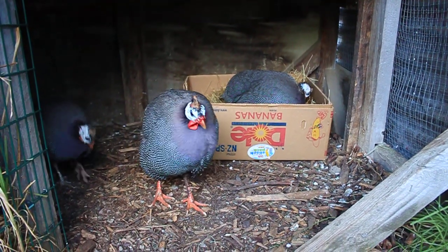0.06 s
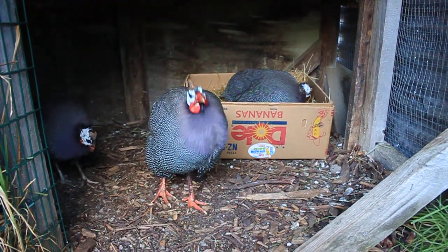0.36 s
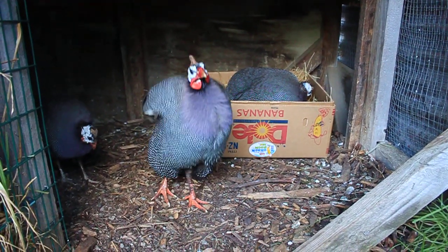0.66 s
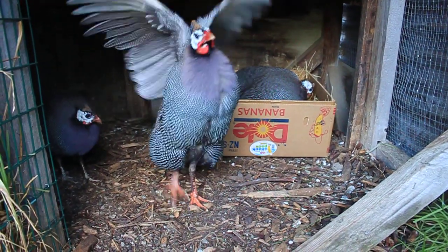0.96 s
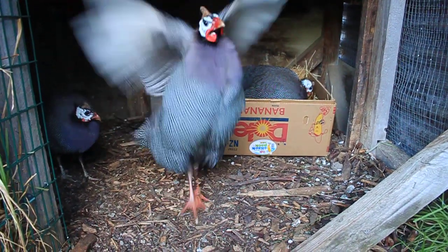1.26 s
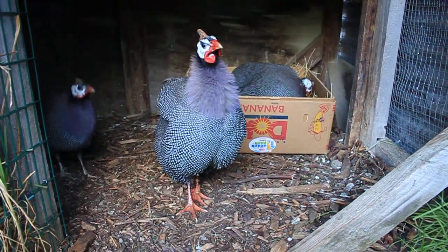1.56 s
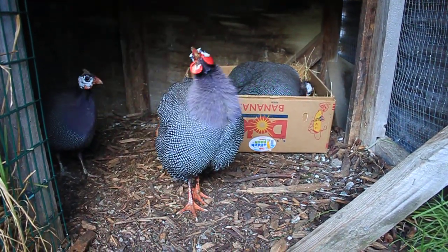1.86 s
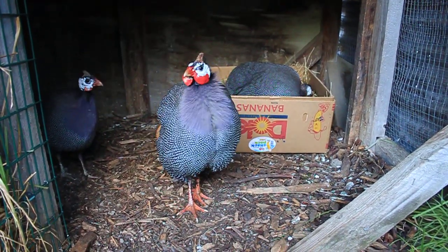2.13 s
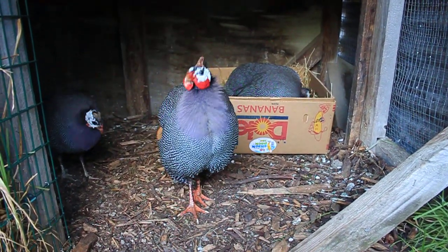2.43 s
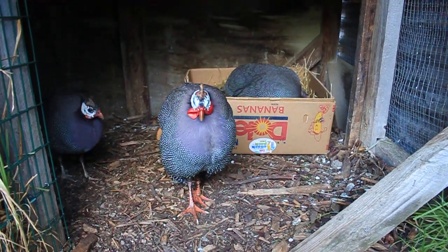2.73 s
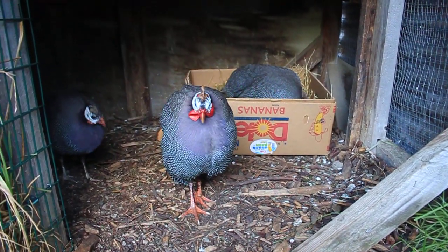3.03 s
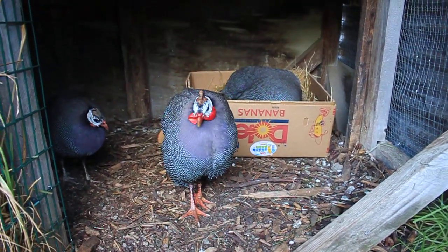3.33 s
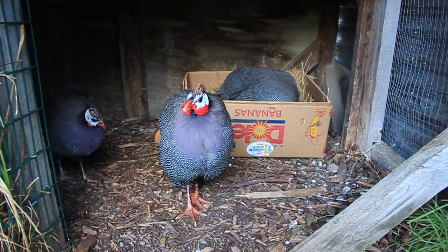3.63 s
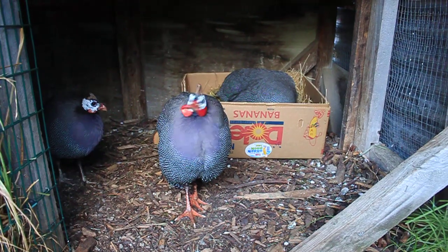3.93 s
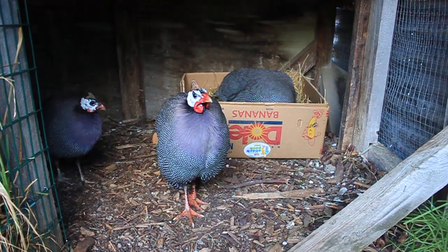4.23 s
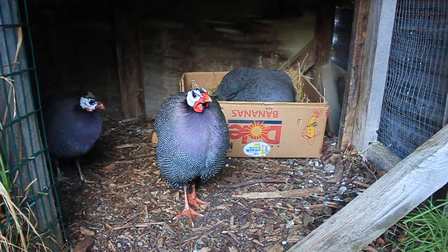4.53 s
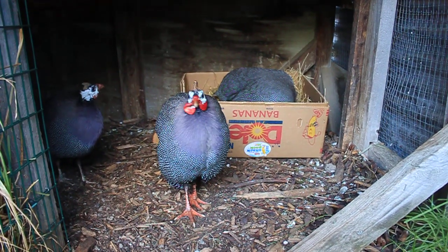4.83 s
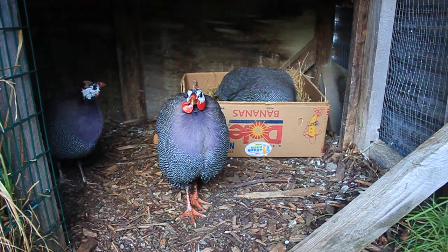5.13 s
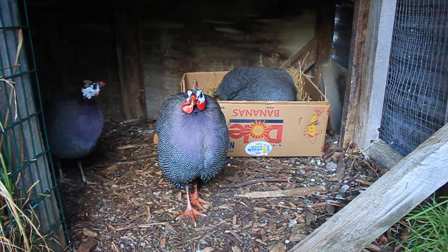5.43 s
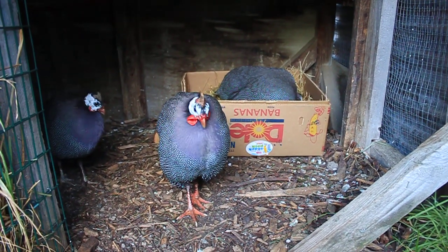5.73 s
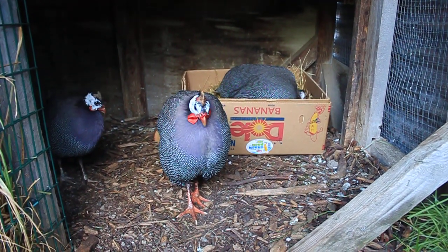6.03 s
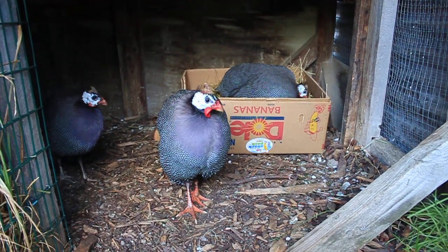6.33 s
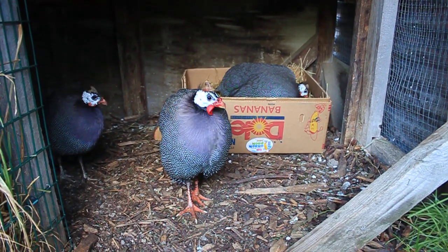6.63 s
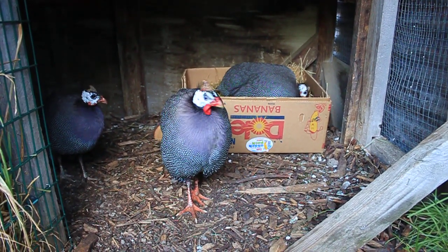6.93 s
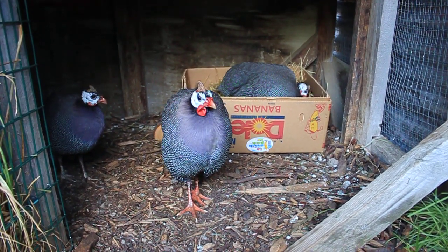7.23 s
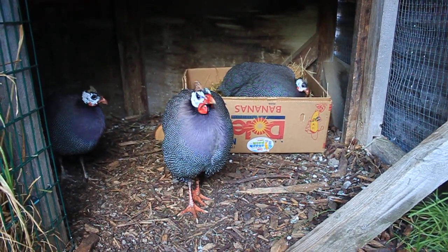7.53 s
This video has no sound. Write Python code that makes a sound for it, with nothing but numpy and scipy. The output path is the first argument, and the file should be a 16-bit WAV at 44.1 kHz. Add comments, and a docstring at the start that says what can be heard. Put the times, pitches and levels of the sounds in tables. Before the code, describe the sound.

Guinea fowl give short, sharp, high chirps in a small wooden coop. Early on, one bird flaps its wings with a soft feathery rustle. Then come four long squeaky calls, each holding a whistle, leaping higher and warbling, with more chirps between them. Feet tick lightly in dry litter and a cardboard box is softly bumped. The birds sound close, with a tight echo, over faint outdoor air and a low hum.

```python
"""Guinea fowl chirp in a small wooden coop, then give four long squeaky calls that hold a low
whistle, leap up and warble. Each voice is a syrinx tone whose harmonics sweep through throat
resonances; a slower membrane vibration adds buzz. Feet tick in the litter, one bird flaps its
wings, the nest box is bumped, soft rasps come from farther back. Close boards echo the voices,
ticks and bumps. A faint hum lies under the outdoor air."""
import sys
import numpy as np
from scipy import signal
from scipy.fft import rfft, irfft, next_fast_len
from scipy.io import wavfile

SR = 44100
rng = np.random.default_rng(int(sys.argv[2]) if len(sys.argv) > 2 else 0)


def wrap_up_sound(samples):
    """Save the sound to the file named by the first command line argument, as 16-bit audio."""
    columns = np.atleast_2d(samples).T
    # keep every value between -1 and 1, then stretch to whole-number steps
    tamed = np.clip(columns, -1, 1)
    steps = np.round(tamed * 32767).astype(np.int16)
    wavfile.write(sys.argv[1], SR, steps)


N = 338247
TIME = np.arange(N) / SR


def from_db(db):
    """Decibels to gain."""
    return 10 ** (np.asarray(db) / 20)


def rms_one(x):
    """Scale to unit power."""
    return x / np.sqrt(np.mean(x ** 2) + 1e-20)


def at_hz(spectrum, hz):
    """Gain in dB, interpolated over log frequency."""
    knots_hz, db = np.transpose(spectrum)
    return np.interp(np.log(np.maximum(hz, 1)), np.log(knots_hz), db)


def coloured(x, spectrum):
    """Filter by rows of freq_hz, gain_db."""
    size = next_fast_len(len(x) + 512)
    gain = from_db(at_hz(spectrum, np.arange(size // 2 + 1) * SR / size))
    return irfft(rfft(x, size) * gain, size)[:len(x)]


def noise(spectrum):
    """Coloured noise, unit power."""
    return rms_one(coloured(rng.standard_normal(N), spectrum))


def drift(rate_hz, size):
    """Low-passed random wander, about unit spread."""
    lowpass = signal.butter(2, rate_hz, fs=SR, output="sos")
    return rms_one(signal.sosfilt(lowpass, rng.standard_normal(size + SR // 8)))[-size:]


def glide(t, knots, values):
    """Interpolate, slowing at each knot."""
    step = np.interp(t, np.sort(knots), np.arange(len(knots)))
    eased = step - .5 * np.sin(2 * np.pi * step) / (2 * np.pi)
    return np.interp(eased, np.arange(len(knots)), values)


def ramp(t, start_s, end_s):
    """Linear rise, 0 to 1."""
    return np.clip((t - start_s) / (end_s - start_s), 0, 1)


def bell(t, centre_s, width_s):
    """Gaussian bump, height 1."""
    return np.exp(-((t - centre_s) / width_s) ** 2)


def add(out, start_s, sound):
    """Mix in from start_s."""
    at = max(int(start_s * SR), 0)
    out[at:at + len(sound)] += sound[:N - at]


def air(level_db=-50):
    """Outdoor air: steady, bass-heavy noise."""
    spectrum = [(15, -56.5), (25, -25.5), (59, -7.5), (108, -7), (137, -2.5), (161, -10), (206, -10.5),
                (249, -11.5), (363, -12), (531, -18.5), (988, -16.5), (2050, -22.5), (2550, -26.5),
                (11000, -35.5), (16000, -40)]   # noise colour: freq_hz, density_db
    return from_db(level_db) * noise(spectrum)


def hum(waver=.28, peak_s=4, rise_db_per_s=1.6, fall_db_per_s=1.5):
    """Low tones waver in level and phase, swelling and fading together."""
    tones = [(70, 16, -60), (135.02, 3.3, -52.5), (209.8, 8.4, -60)]   # hum tones: pitch_hz, width_hz, level_db
    out = np.zeros(N)
    for pitch_hz, width_hz, level_db in tones:
        phasor = 1 + waver * (drift(width_hz, N) + 1j * drift(width_hz, N))
        out += from_db(level_db) * rms_one(np.real(phasor * np.exp(2j * np.pi * pitch_hz * TIME)))
    return out * from_db(-np.maximum(rise_db_per_s * (peak_s - TIME), fall_db_per_s * (TIME - peak_s)))


def syrinx(pitch_hz, effort_db, throat, overtone_db, hoarse_rad, buzz=0, fall_db=8):
    """Five harmonics through the throat; buzz bends the cycles and pulses the overtones."""
    phase = 2 * np.pi * np.cumsum(pitch_hz) / SR + np.angle(1 + buzz)
    phase += hoarse_rad * drift(1100, len(phase))   # turbulence unsettles single cycles
    bursts = np.exp(2.8 * (np.real(buzz) - .78 * np.abs(buzz)))
    tone = np.sin(phase)
    for k in range(2, 6):
        gain = from_db(overtone_db - fall_db * (k - 2.5)) * (k * pitch_hz < SR / 2)
        tone += bursts * gain * np.sin(k * phase)
    edges = signal.windows.tukey(len(tone), min(.004 * SR / len(tone), 1))
    return coloured(np.sqrt(2) * tone * from_db(effort_db) * np.abs(1 + buzz) * edges, throat)


def chirps(events, shape, overtone_db, jitter, hoarse_rad):
    """One quick syrinx gesture, stretched and transposed per chirp."""
    throat = [(1900, -6), (2700, 1.5), (3400, -0.5), (4000, -1), (4600, -15), (5400, -22), (6600, -21.5),
              (8000, -15.5), (9200, -19.5), (10600, -21), (15500, -37)]   # throat and beak resonances: freq_hz, gain_db
    knots, pitch_ratio, effort_db = np.transpose(shape)
    out = np.zeros(N)
    for start_s, length_s, top_hz, level_db in events:
        progress = np.linspace(0, 1, int(length_s * SR))
        pitch_hz = top_hz * glide(progress, knots, pitch_ratio)
        pitch_hz *= 1 + jitter * drift(610, len(progress))
        drive_db = level_db + glide(progress, knots, effort_db)
        add(out, start_s, syrinx(pitch_hz, drive_db, throat, overtone_db, hoarse_rad, fall_db=6))
    return out


def chatter():
    """Chips and cheeps arch in register jumps; a pip rises, peeps fall."""
    # chirp events: start_s, length_s, top_hz, level_db
    chips = [(.247, 0.044, 4910, -24), (1.7205, 0.04, 4644, -29), (2.167, 0.038, 4370, -32),
             (3.559, 0.0492, 4745, -24.5), (3.966, .046, 4870, -24), (6.407, 0.048, 4958, -26.5),
             (6.641, .044, 4834, -26)]
    cheeps = [(.313, 0.05, 5450, -26), (.569, 0.049, 4874, -28), (2.6845, 0.0556, 5030, -29),
              (4.699, 0.047, 5140, -30.5), (5.0415, .055, 5184, -25.5), (6.58, .053, 5240, -29.5),
              (6.936, .048, 5186, -29)]
    pips = [(1.0425, 0.019, 4540, -23.5)]
    peeps = [(2.446, 0.028, 3595, -40.5), (2.757, 0.019, 3700, -36.5)]
    # gestures: length_share, pitch_ratio, effort_db
    chip_shape = [(0, .59, -14.5), (.13, .52, -6), (.17, .7, -1), (.31, .64, -4), (.35, .76, 5),
                  (.4, .88, 0), (.68, 0.9787, 4), (.819, .84, -4.5), (.921, .6, 0.5), (1, 0.4, -9)]
    cheep_shape = [(0, .44, -20.5), (.185, 0.45, -5), (0.217, 0.63, 4), (.35, .61, -0.5), (.45, .87, 1.5),
                   (.65, 1, 0), (.83, .88, -9.5), (.94, .58, -9), (1, .46, -17)]
    pip_shape = [(0, .52, -7), (0.221, .72, 5), (.45, 0.89, 0.5), (.75, 1, 0.5), (1, 1, -35)]
    peep_shape = [(0, 0.98, -10.5), (.45, 0.98, -11), (.75, .86, -4), (1, 0.66, 1.5)]
    return (chirps(chips, chip_shape, overtone_db=-4.5, jitter=.04, hoarse_rad=.12)
            + chirps(cheeps, cheep_shape, overtone_db=-6.5, jitter=.049, hoarse_rad=.086)
            + chirps(pips, pip_shape, overtone_db=-7, jitter=.056, hoarse_rad=.1)
            + chirps(peeps, peep_shape, overtone_db=1.5, jitter=.008, hoarse_rad=.08))


def litter(t60_s=.013, half_width=.082):
    """Feet and beaks snap dry litter: tiny band-passed noise bursts."""
    ticks = [(0.367, -33, 11530), (.3842, -32.5, 11500), (0.969, -30.5, 10040), (1.53, -39.5, 11000),
             (1.793, -39, 11000), (1.906, -34.5, 11030), (1.907, -35.5, 3200), (3.244, -38, 11500),
             (3.687, -34.5, 10630), (3.687, -36, 3000), (4.767, -45.5, 10000), (5.2935, -43, 10500),
             (5.752, -36, 10500), (5.915, -35, 10400), (6.846, -39, 11540)]   # snaps: start_s, peak_db, centre_hz
    out, t = np.zeros(N), TIME[:SR // 20]
    for start_s, peak_db, centre_hz in ticks:
        edges_hz = [centre_hz * (1 - half_width), centre_hz * (1 + half_width)]
        band = signal.butter(1, edges_hz, "band", fs=SR, output="sos")
        snap = signal.sosfilt(band, rng.standard_normal(len(t)) * from_db(-60 * t / t60_s))
        add(out, start_s, from_db(peak_db) * snap / np.abs(snap).max())
    return out


def wings(release_s=.16, grain_db=1.5):
    """Feathers slide over each other: a grainy rustle swelling with each beat."""
    strokes = [(.9, 0.55, 0.058, -47.5), (1.032, .1, 0.012, -46), (1.11, 0.116, 0.031, -44.5),
               (1.235, .12, 0.0874, -45.5)]   # wing beats: full_spread_s, swell_s, hold_s, level_db
    feathers = [(200, 4.5), (700, 1.5), (2000, -0.5), (4500, 3), (7000, -3.5), (12000, 2.5), (16000, -6.5)]   # rustle colour: freq_hz, density_db
    envelopes_db = []
    for spread_s, swell_s, hold_s, level_db in strokes:
        before, after = (spread_s - TIME) / swell_s, (TIME - spread_s - hold_s) / release_s
        envelopes_db.append(level_db - 20 * np.maximum(np.maximum(before, after), 0))
    return noise(feathers) * from_db(np.max(envelopes_db, axis=0) + grain_db * drift(180, N))


def nest_box():
    """A bird bumps the box; its cardboard modes ring at strengths that vary per bump."""
    bumps = [(1.727, -52.5), (3.597, -41), (3.605, -40.5), (3.779, -49.5)]   # impacts: start_s, level_db
    modes = [(324.4, -2, 0.41), (427, 4, 0.065), (545, 7, 0.03), (760, -23, 0.054), (960, -20.5, 0.05)]   # box modes: freq_hz, gain_db, t60_s
    out, t = np.zeros(N), TIME[:SR // 4]
    for start_s, level_db in bumps:
        for freq_hz, gain_db, t60_s in modes:
            envelope = from_db(level_db + gain_db + rng.uniform(-2, 2) - 60 * t / t60_s)
            add(out, start_s, envelope * np.sin(2 * np.pi * freq_hz * t))
    return out


def rasps():
    """Faint hoarse noise swells from farther back."""
    swells = [(1.78, 0.14, -52.5), (3.618, 0.216, -54)]   # rasps: start_s, length_s, level_db
    spectrum = [(1800, -38), (2700, -9), (3400, 4.5), (3900, -6), (4800, -16), (8000, -35)]   # rasp colour: freq_hz, density_db
    envelope = np.zeros(N)
    for start_s, length_s, level_db in swells:
        add(envelope, start_s, from_db(level_db) * signal.windows.tukey(int(length_s * SR), .7))
    return envelope * noise(spectrum)


def opening(t, yelp, hold, summit, warble, scoop_s=.015, catch_s=.005, settle_s=.05, rise_s=.027):
    """Pitch and effort through yelp, held note, leap, summit and downward swoop."""
    start_s, length_s, top_hz, yelp_db, catch_db = yelp
    held_hz, held_db, dip_s = hold
    leap_s, summit_end_s, first_hz, middle_hz, last_hz, leap_db, summit_db = summit
    foot_s, _, foot_hz, _, _, _, foot_db, _, _ = warble
    knots_s, knots_hz, knots_db = np.transpose([
        (start_s, .65 * held_hz, yelp_db - 29),   # soft scoop
        (start_s + scoop_s / 2, .86 * held_hz, yelp_db - catch_db),
        (start_s + scoop_s, .92 * top_hz, yelp_db - catch_db),
        (start_s + scoop_s + catch_s, .965 * top_hz, yelp_db),   # voice catches
        (start_s + .43 * length_s, top_hz, yelp_db),
        (start_s + .7 * length_s, .97 * top_hz, yelp_db - 5),
        (start_s + .86 * length_s, held_hz, held_db),
        (start_s + length_s, .94 * held_hz, held_db),
        (start_s + length_s + settle_s, held_hz, held_db),   # held note
        (leap_s - settle_s, 1.0121 * held_hz, held_db),
        (leap_s, 1.035 * held_hz, held_db + 6.5),
        (leap_s + .38 * rise_s, held_hz + .22 * (first_hz - held_hz), leap_db),
        (leap_s + rise_s, first_hz, summit_db),   # summit
        ((leap_s + rise_s + summit_end_s) / 2, middle_hz, summit_db),
        (summit_end_s, last_hz, summit_db)])
    swoop = 1 - (1 - ramp(t, summit_end_s, foot_s)) ** 1.6
    dip_db = 13.5 * bell(t, dip_s, width_s=.012)   # brief dip in the held note's loudness
    effort_db = glide(t, knots_s, knots_db) + (foot_db - summit_db) * swoop
    return glide(t, knots_s, knots_hz) + (foot_hz - last_hz) * swoop, effort_db - dip_db


def buzzing(t, strain, release_s=.02):
    """Slower membrane vibration, unsteady under strain: unit phasor and depth."""
    spells = [(3.045, .02, 3.182, 360, 370, .85), (3.27, .23, 3.56, 580, 550, .7),
              (4.475, .015, 4.535, 400, 400, .6), (5.535, .02, 5.618, 355, 370, .85),
              (5.71, .33, 6.12, 570, 430, .75), (7.115, .02, 7.175, 300, 300, .35),
              (7.45, .11, 7.61, 400, 400, .22)]   # buzz spells: start_s, swell_s, end_s, first_hz, last_hz, depth_ratio
    depth, knots = 0, []
    for start_s, swell_s, end_s, first_hz, last_hz, full in spells:
        depth += full * ramp(t, start_s, start_s + swell_s) * (1 - ramp(t, end_s - release_s, end_s))
        knots += [(start_s, first_hz), (end_s, last_hz)]
    rate_hz = np.interp(t, *np.transpose(knots))
    rate_hz *= 1 + strain * (.07 * drift(30, len(t)) + .16 * drift(300, len(t)))
    depth *= 1 + .3 * strain * drift(90, len(t))
    return np.exp(2j * np.pi * np.cumsum(rate_hz) / SR), np.clip(depth, 0, .95)


def warbling(t, warble, swings, drop_s=.03, drop_to_hz=2200, drop_db=7):
    """Pitch, effort, progress: quickening, shrinking swings on a climbing line, then a drop."""
    flicks = [(4.838, 620), (4.872, 380), (7.502, 260), (7.537, 680)]   # pitch flicks late in the whistles: centre_s, rise_hz
    start_s, end_s, foot_hz, rest_hz, final_hz, climb_power, *efforts_db = warble
    first_period_s, final_period_s, height_hz, kept_ratio, loss_db = swings
    climb_s, fall_s = start_s + first_period_s, end_s - drop_s
    turns = np.arange(16)
    periods_s = final_period_s + (first_period_s - final_period_s) * .4 ** turns
    cycle = np.interp(t, start_s + np.cumsum(periods_s) - periods_s, turns)
    size = kept_ratio ** np.floor(cycle)
    swing = np.sin(np.pi * (cycle % 1) ** .89) ** 2   # rises faster than it falls
    progress = ramp(t, climb_s, fall_s)
    line_hz = foot_hz + (rest_hz - foot_hz) * ramp(t, start_s, climb_s)
    line_hz += (final_hz - rest_hz) * progress ** climb_power
    flick_hz = sum(rise_hz * bell(t, centre_s, width_s=.008) for centre_s, rise_hz in flicks)
    pitch_hz = line_hz + height_hz * size * swing + flick_hz
    effort_db = np.interp(t, np.linspace(start_s, fall_s, len(efforts_db)), efforts_db)
    effort_db -= loss_db * size ** .43 * swing   # level dips outlast the swings
    drop = ramp(t, fall_s, end_s) ** 2.5
    return pitch_hz + (drop_to_hz - pitch_hz) * drop, effort_db - drop_db * drop ** 2, progress


def long_call(call, throat, overtone_db, jitter, hoarse_rad, flicker_db, bend, bright_db):
    """Held note leaping into a warble; upward strain makes it brighter, unsteady and hoarse."""
    yelp, hold, summit, warble, swings = call
    start_s, summit_end_s, warble_s, end_s = yelp[0], summit[1], warble[0], warble[1]
    t = TIME[int(start_s * SR):int(end_s * SR)]
    *late, progress = warbling(t, warble, swings)
    pitch_hz, effort_db = np.where(t < warble_s, opening(t, yelp, hold, summit, warble), late)
    strain = np.clip((pitch_hz - 2700) / 1100, .06, 1)
    fraying = np.interp(t, [summit_end_s, warble_s], [.25, 1]) + .58 * progress ** 2
    phasor, depth = buzzing(t, strain)
    buzz = depth * (phasor - .12 / phasor)   # upper sideband stronger
    softness = np.clip((-18.5 - effort_db - at_hz(throat, pitch_hz)) / 10, 0, 1)
    effort_db -= 10 * np.log10(1 + depth ** 2)   # offsets sideband power
    effort_db += flicker_db * softness * drift(40, len(t))   # soft notes flicker in level
    wander = .00406 * drift(14.4, len(t))
    shake = jitter * fraying * drift(160, len(t))
    buzz_tug = bend * depth * phasor.imag
    pitch_hz *= 1 + wander + strain * (shake + buzz_tug)
    turbulence_rad = hoarse_rad * fraying * strain ** 2
    voice = syrinx(pitch_hz, effort_db, throat, overtone_db + bright_db * strain, turbulence_rad, buzz)
    out = np.zeros(N)
    add(out, start_s, voice)
    return out


def long_calls():
    """Squeal, whistle, squeal, whistle: one row each in the five gesture tables."""
    yelps = [(2.914, .063, 2677, -14.5, 20.5), (4.166, 0.079, 3129, -25.5, 4.5),
             (5.356, .072, 2706, -14, 14), (6.827, 0.077, 3040, -28.5, 5)]   # opening yelps: start_s, length_s, top_hz, effort_db, catch_db
    holds = [(2204, -37.5, 3.038), (2900, -36, 4.37), (2160, -35.5, 5.455), (2799, -33, 7.058)]   # held notes: pitch_hz, effort_db, dip_s
    # leaps and summits: leap_s, end_s, first_hz, middle_hz, last_hz, leap_db, summit_db
    summits = [(3.163, 3.238, 4545, 4330, 4514, -24.5, -31.5), (4.446, 4.51, 4300, 4520, 4575, -31, -31),
               (5.599, 5.673, 4535, 4250, 4430, -23, -29.5), (7.092, 7.157, 4045, 4180, 4280, -30.5, -33.5)]
    # warble lines: start_s, end_s, foot_hz, rest_hz, final_hz, climb_power, first_db, middle_db, last_db
    warbles = [(3.286, 3.618, 2823, 3199, 4105, 2.84, -27.5, -20, -27),
               (4.569, 4.925, 3295, 3316, 4193, 1.29, -27, -25, -28.5),
               (5.727, 6.123, 2664, 2799, 3917, 1.3, -27, -23, -25),
               (7.217, 7.616, 3082, 3108, 3838, .8, -20, -25.5, -28.5)]
    # warble swings: first_period_s, final_period_s, height_hz, kept_ratio, loss_db
    swings = [(.067, .038, 950, .42, 2), (.08, .051, 880, .6, 6), (.061, .043, 950, .66, 4),
              (.075, .046, 780, .52, 13)]
    # throat and beak resonances: freq_hz, gain_db
    squeal_throat = [(1400, -4), (2100, 2), (2700, 1), (3400, 1), (4000, -7.5), (4600, -15), (5400, -15.5),
                     (6500, -30), (8200, -15), (9300, -13.5), (10600, -18.5), (12000, -12.5), (15500, -31)]
    whistle_throat = [(2000, -5), (2800, -1), (3700, -1), (4400, -2), (5000, -13), (5900, -14.5),
                      (7000, -27.5), (8400, -14.5), (10000, -27), (11400, -13), (13600, -27), (15000, -20)]
    squeal_1, whistle_1, squeal_2, whistle_2 = zip(yelps, holds, summits, warbles, swings)
    return (long_call(squeal_1, squeal_throat, overtone_db=-17.5, jitter=.02, hoarse_rad=.025,
                      flicker_db=2.5, bend=.028, bright_db=11)
            + long_call(squeal_2, squeal_throat, overtone_db=-15.5, jitter=.019, hoarse_rad=.015,
                        flicker_db=2, bend=.016, bright_db=8.5)
            + long_call(whistle_1, whistle_throat, overtone_db=-5.5, jitter=.01, hoarse_rad=.014,
                        flicker_db=3, bend=.036, bright_db=1.4)
            + long_call(whistle_2, whistle_throat, overtone_db=-8, jitter=.01316, hoarse_rad=.043,
                        flicker_db=2, bend=.098, bright_db=6.5))


def coop(x, t60_s=.092, build_s=.00097, tail_db=-7, direct_db=-1.5):
    """Close boards: a few distinct echoes and a short diffuse tail."""
    echoes = [(.0023, -17.5), (.0049, -15.5), (.0073, -28.5), (.0092, -14.5), (0.0221, -27)]   # wall reflections: delay_s, gain_db
    t = TIME[:SR // 3]
    tail = rng.standard_normal(len(t)) * from_db(-60 * t / t60_s) * (1 - np.exp(-t / build_s))
    response = from_db(tail_db) * tail / np.linalg.norm(tail)
    response[0] += from_db(direct_db)
    for delay_s, gain_db in echoes:
        response[int(delay_s * SR)] += from_db(gain_db)
    return signal.fftconvolve(x, response)[:N]


def scene():
    """Birds and their movements in the coop, over air and hum; mono."""
    inside = coop(long_calls() + chatter() + litter() + nest_box())
    return (inside + rasps() + wings() + air() + hum())[None]


def record(dry, low_cut_hz=27, high_cut_hz=15900):
    """The microphone drops the deepest bass; the top is cut steeply."""
    highpass = signal.butter(4, low_cut_hz, "high", fs=SR, output="sos")
    lowpass = signal.ellip(10, .2, 80, high_cut_hz, fs=SR, output="sos")
    return signal.sosfilt(lowpass, signal.sosfilt(highpass, dry))


dry = scene()
out = record(dry)
wrap_up_sound(out)
```